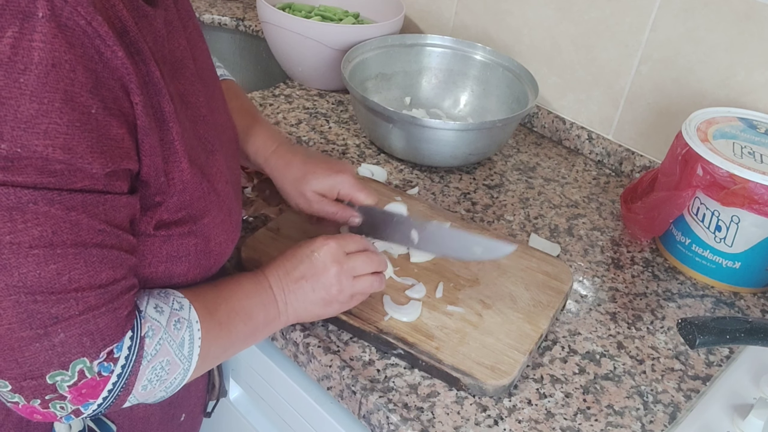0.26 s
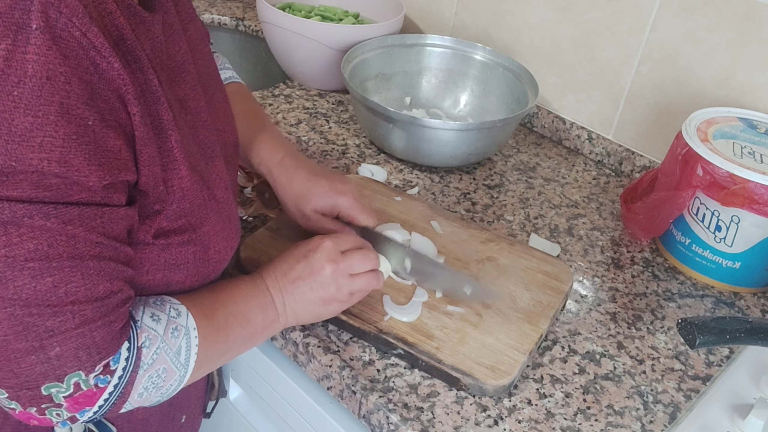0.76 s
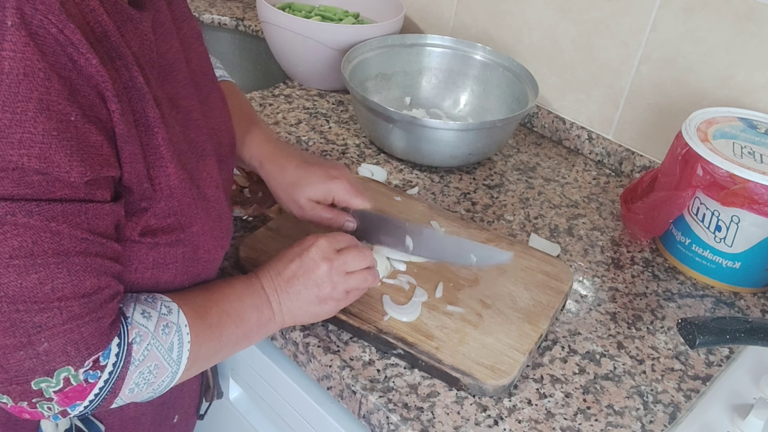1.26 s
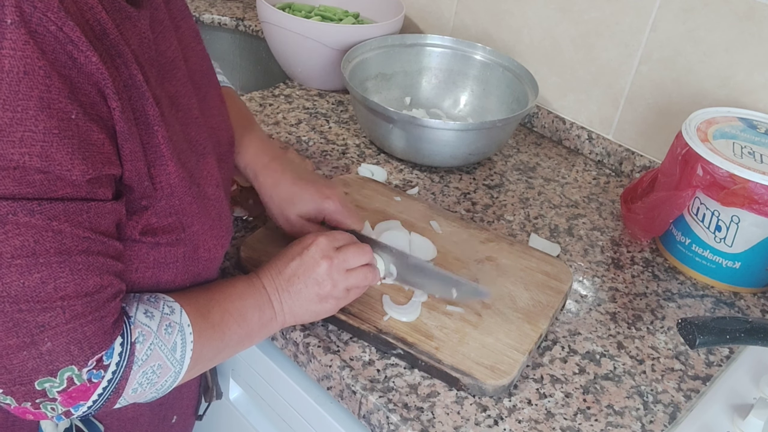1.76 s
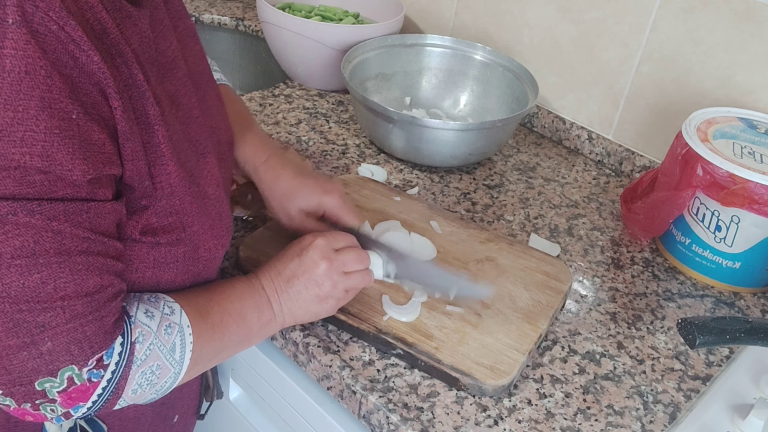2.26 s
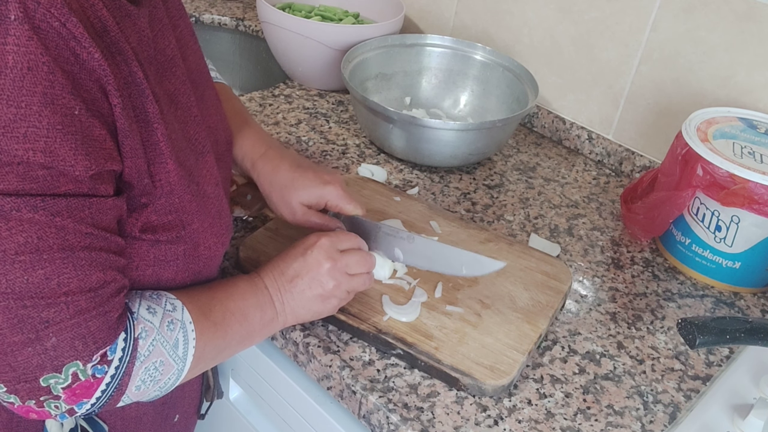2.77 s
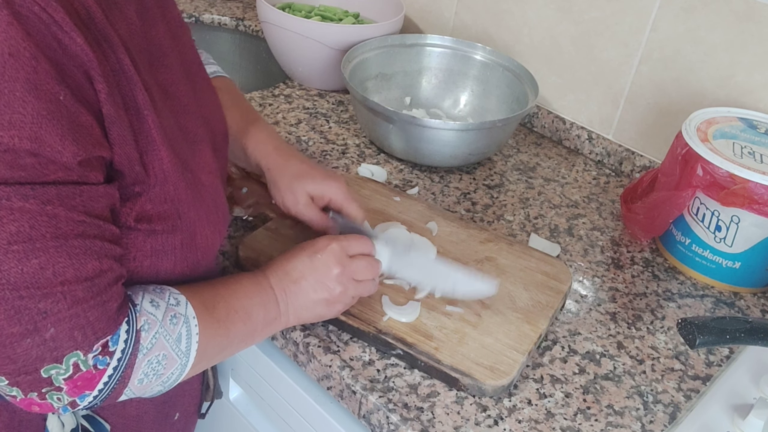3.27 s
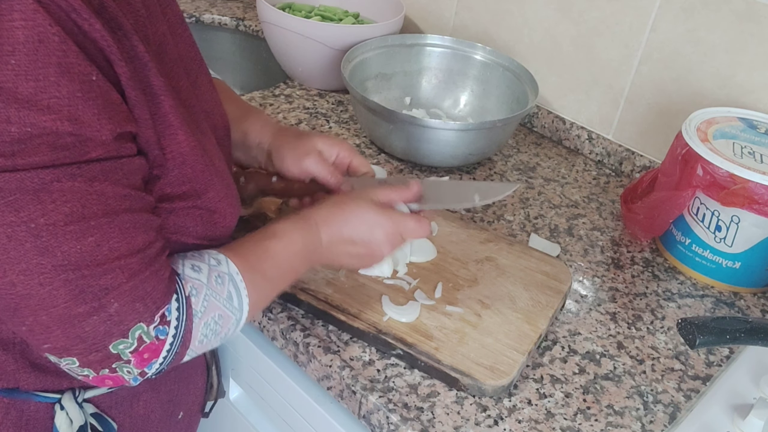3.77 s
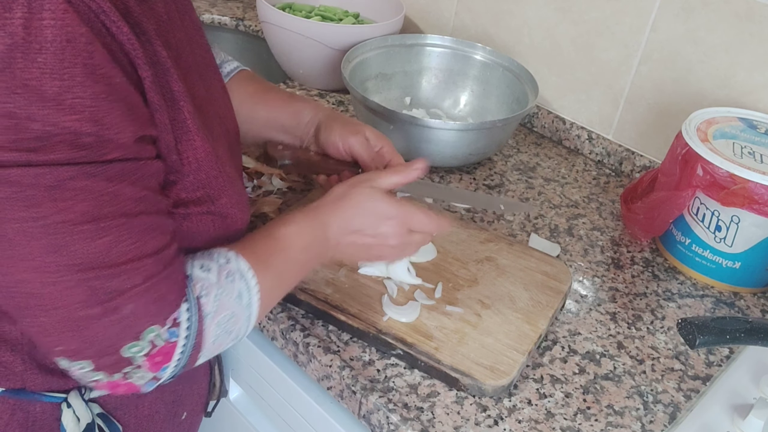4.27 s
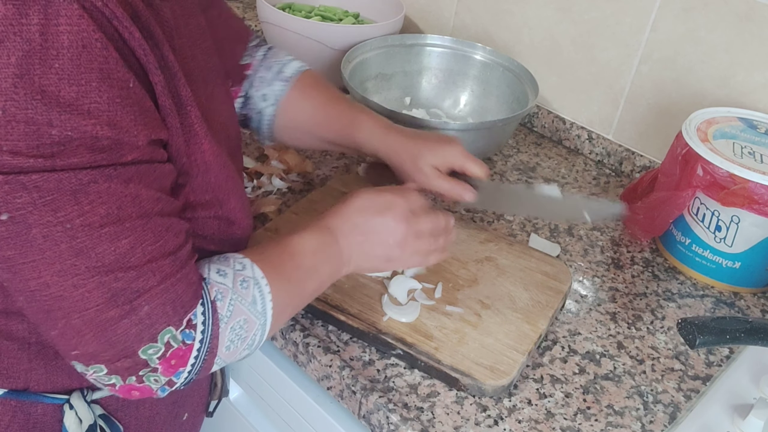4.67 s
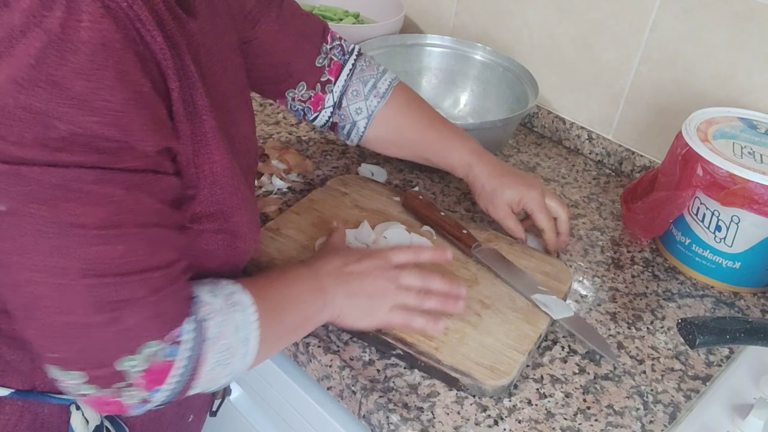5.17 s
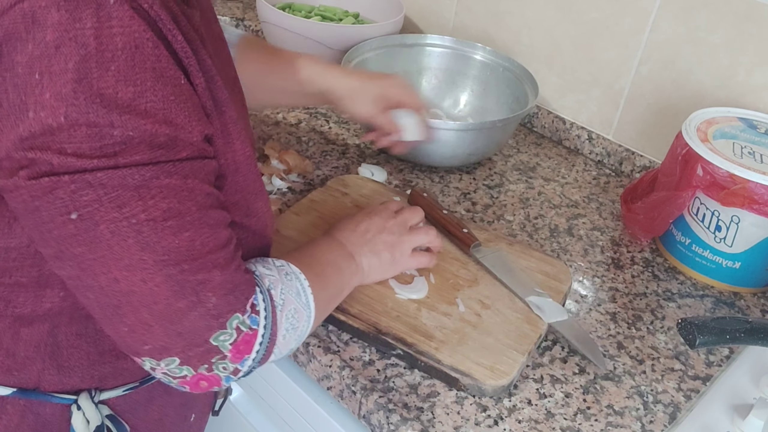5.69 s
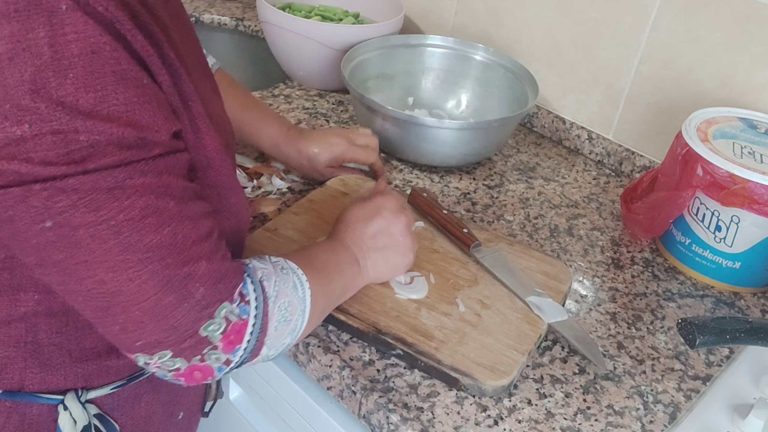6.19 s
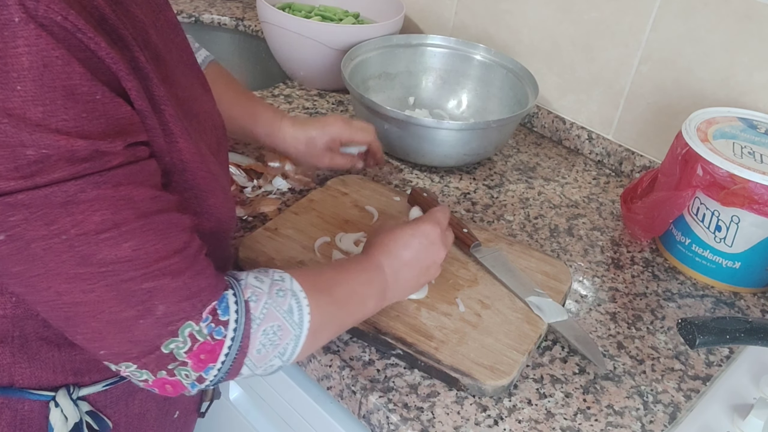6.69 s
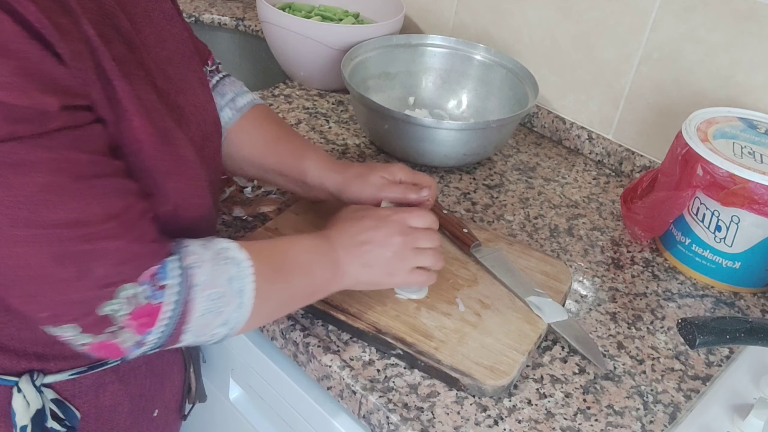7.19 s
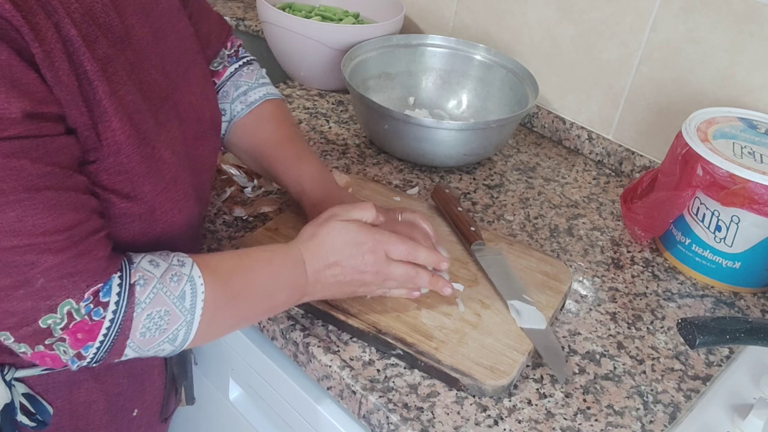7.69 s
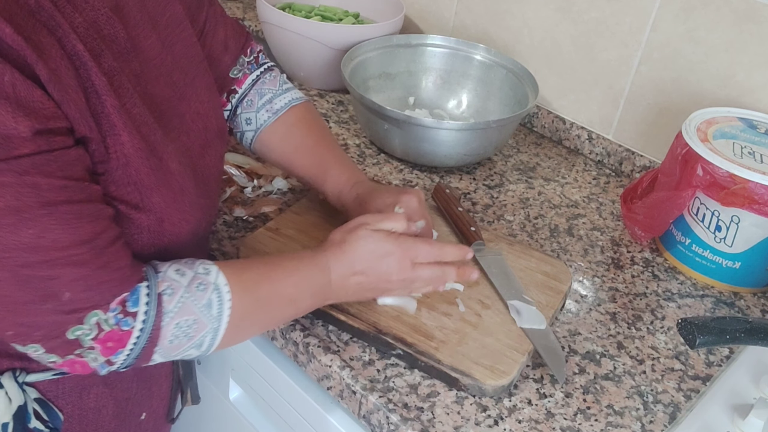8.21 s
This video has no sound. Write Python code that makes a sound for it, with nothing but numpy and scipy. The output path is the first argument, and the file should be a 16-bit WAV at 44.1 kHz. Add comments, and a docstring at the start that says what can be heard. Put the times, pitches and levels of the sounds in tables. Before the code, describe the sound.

A knife chops onion in quick strokes on a wooden board and clatters down, then hands softly gather the wet slices in a small kitchen.

```python
"""A kitchen knife slices an onion on a wooden board, on a stone counter in a small tiled kitchen.
Each stroke crunches through the layers and knocks on the board; the wall echoes it, the room booms
and the cupboard below shudders. The knife is laid down with a clatter, then wet hands gather the
slices and peel them apart, and one ring cracks. An appliance hums; a bird chirps outside."""
import sys
import numpy as np
from scipy import signal
from scipy.fft import rfft, irfft, next_fast_len
from scipy.io import wavfile

SR = 44100
rng = np.random.default_rng(int(sys.argv[2]) if len(sys.argv) > 2 else 0)


def log_audio(samples):
    """Write samples as a 16-bit WAV file to the path given in sys.argv[1]."""
    # one column per channel
    frames = np.atleast_2d(samples).T
    # limit to full scale, then quantise
    limited = np.clip(frames, -1, 1)
    pcm = np.round(limited * 32767).astype(np.int16)
    wavfile.write(sys.argv[1], SR, pcm)


N = 372629
TIME = np.arange(N) / SR

# The blade hits the board. Each row: start in seconds, then in relative dB the level, low thud,
# middle clack, bright edge, steel tick and the crunch that leads up to the hit.
CHOPS = [(0.4977, -4.5, -2, -5, 0, -6, -40), (0.7482, 5.5, -8, -4, -0.5, -3.5, -38),
         (0.9638, 4, -2, 0.5, 4.5, 5, -41), (1.1851, 3.5, -2, -1.5, 3.5, 0.5, -38),
         (1.391, 3.5, 2.5, 2.5, 7.5, 7.5, -48), (1.6028, -4, 8.5, 3, -5, 5, -39),
         (1.814, -4, 9, 2.5, 0.7, 2, -39), (2.025, 3.5, -3, -0.5, -0.5, -5, -38),
         (2.2331, 3.5, -2.5, 0.5, 2.5, -2.5, -40.5), (2.4578, -3.5, 6, 3.5, 6, 7, -68),
         (3.1005, 4.5, -13, 11.5, 0, 4, -40)]
# The knife is laid down, then hands bump the board. Each row: as above, without the crunch.
KNOCKS = [(4.9484, -15, 7.5, 10.5, -3, 14.5), (4.9824, -15, 11, 21.5, 9, 16.5),
          (4.9958, -16.5, 0, 7, 20.5, 26.5), (5.0018, -25, 9, 11, 13, 32), (5.0435, -14, 6, 10.5, 1, -3),
          (5.1599, -25.5, 11.5, 12, 4, 16), (5.392, -40.5, 13, 14, 7, 3), (5.627, -25, 10, 14, 13.5, 17),
          (5.96, -41.5, 2.5, 8, 12, 4), (7.509, -27.5, 14.5, 15.5, 13, 19), (7.845, -30.5, 2.5, 2, 2, 11)]


def from_db(db):
    """Turn decibels (dB) into a factor to multiply a sound by."""
    return np.exp(np.asarray(db) * (np.log(10) / 20))


def rms_one(x):
    """Scale a signal so that its average strength (rms) is 1."""
    return x / np.sqrt(np.mean(x ** 2) + 1e-20)


def at_hz(points, hz):
    """Read between the rows of a (Hz, value) table, with octaves evenly spaced."""
    row_hz, values = np.array(points).T
    return np.interp(np.log(hz + 1e-9), np.log(row_hz), values)


def add(track, s, sound):
    """Mix a sound into a track, starting at s seconds."""
    start = max(round(s * SR), 0)
    track[..., start:start + sound.shape[-1]] += sound[..., :N - start]


def drift(per_s):
    """A curve that wanders to a new random value per_s times a second."""
    values = rng.standard_normal(int(N / SR * per_s) + 2)
    return rms_one(np.interp(TIME * per_s, np.arange(len(values)), values))


def ring(t, hz, t60):
    """A struck tone, silent before t = 0. Its ring time, t60, is how long it takes to fade 60 dB."""
    t = np.maximum(t, 0)
    return np.sin(2 * np.pi * hz * t) * from_db(-60 * t / t60)


def struck(tones, t):
    """One blow rings all the tones of an object; neighbours swing opposite ways."""
    return sum((-1) ** k * from_db(db) * ring(t, hz, t60) for k, (hz, db, t60) in enumerate(tones))


def filtered(x, order, hz, kind="low"):
    """Keep what lies below hz, or between two frequencies for a "band"."""
    return signal.sosfilt(signal.butter(order, hz, kind, fs=SR, output="sos"), x)


def coloured(x, spectrum):
    """Shape the lows and highs of a signal by a (Hz, dB) table; the result has strength 1."""
    size = next_fast_len(N)
    hz = np.arange(size // 2 + 1) * SR / size
    return rms_one(irfft(rfft(x, size) * from_db(at_hz(spectrum, hz)), size)[:N])


def grains(per_s, spread_db, spectrum):
    """Tiny bursts of random size, such as cells breaking or wet skins parting."""
    sizes = from_db(spread_db * np.minimum(rng.exponential(1, N), 4)) * rng.choice([-1, 1], N)
    return coloured(sizes * (rng.random(N) < per_s / SR), spectrum)


def stereo(a, b, hz):
    """Two unrelated signals become left and right, as alike and as loud as the microphones hear them."""
    # Sound from all around. Each row: frequency in Hz, how alike the sides are from -1 to 1.
    likeness = [(20, 0.3), (150, 0.5), (400, 0.6), (700, 0.09), (1300, -0.29), (3000, 0), (15000, 0)]
    # The louder side. Each row: frequency in Hz, left minus right in dB.
    balance = [(20, 2), (1000, -0.5), (2400, -1), (4400, -2.5), (8000, -2), (15000, -3.5)]
    alike = np.clip(at_hz(likeness, hz), -1, 1)
    sides = np.array([[1], [-1]])
    both = np.sqrt((1 + alike) / 2) * a + sides * np.sqrt((1 - alike) / 2) * b
    return both * from_db(sides * at_hz(balance, hz) / 2)


def background(air_db=-50.0, waver_db=1.0):
    """The house rumbles and hisses while an appliance hums."""
    # Rumble and hiss. Each row: frequency in Hz, relative level in dB.
    air_spectrum = [(12, 4.5), (25, -10.5), (50, -14), (120, -22), (300, -26), (600, -28.5), (1200, -33),
                    (3000, -39.5), (7000, -48.5), (15000, -48)]
    # The appliance's tones. Each row: pitch in Hz, average level in dB.
    hum_tones = [(99.5, -74), (199.5, -71.5), (231, -81), (301, -78.5), (344, -76.5), (4813, -88)]
    size = next_fast_len(N)
    a, b = (rfft(coloured(rng.standard_normal(N), air_spectrum), size) for _ in range(2))
    air = irfft(stereo(a, b, np.arange(len(a)) * SR / size), size)[:, :N]
    hum = sum(from_db(db + waver_db * drift(per_s=9.1)) * np.sqrt(2) * np.sin(2 * np.pi * hz * TIME)
              for hz, db in hum_tones)
    return from_db(air_db) * air + hum


def bird():
    """A bird sings short gliding chirps; a fast flutter of pitch makes them raspy."""
    # Each row: start and length in seconds, first and last pitch in Hz, level in dB,
    # flutter as a share of the pitch.
    chirps = [(0.0, 0.062, 3980, 3730, -55.5, 0.073), (0.127, 0.18, 3480, 3320, -69.5, .02),
              (1.54, .08, 2900, 3220, -50, 0.049), (3.79, 0.08, 3206, 3215, -67, .015),
              (3.956, .09, 3300, 3240, -71, 0.019), (4.116, .11, 3240, 3200, -72, 0.016),
              (5.815, 0.2, 3990, 4720, -41.5, 0.074)]
    out, wobble = np.zeros(N), drift(per_s=900)
    for s, length, first_hz, last_hz, db, flutter in chirps:
        count = int(length * SR)
        hz = np.linspace(first_hz, last_hz, count) * (1 + flutter * wobble[:count])
        add(out, s, from_db(db) * np.hanning(count) * np.sin(2 * np.pi * np.cumsum(hz) / SR))
    return out


def onion(gain_db=4.0, first_cut_s=0.019, slowing=0.07, release_s=0.006):
    """Cells burst louder as the blade sinks and stop at the board; snapping layers crunch the same way."""
    # Single layers snap apart. Each row: start and length in seconds, relative level in dB.
    snaps = [(2.824, .018, -47), (3.867, 0.023, -55), (4.516, 0.051, -56), (4.615, 0.025, -59.5),
             (6.919, 0.0049, -46), (6.944, 0.021, -43.5), (7.899, 0.022, -42.5)]
    # Bursting cells. Each row: frequency in Hz, relative level in dB.
    crunch_spectrum = [(200, -9), (800, 2), (2000, -1.5), (4000, -1.5), (6500, 2), (10000, 0.5), (15000, 2)]
    cut_lengths = first_cut_s * (1 + slowing) ** np.arange(len(CHOPS))
    cuts = [(s - length, length, db) for (s, *_, db), length in zip(CHOPS, cut_lengths)]
    effort = np.zeros(N)
    for s, length, db in cuts + snaps:
        end = s + length
        effort += from_db(db) * np.interp(TIME, [s, end, end + release_s], [0.5, 1, 0], left=0)
    return from_db(gain_db) * effort * grains(per_s=7000, spread_db=2.5, spectrum=crunch_spectrum)


def board_blows(rows, thud_hz, bass_db, ring_scale, tick_db, tick_t60, boom_db, boom_t60, boom_lag_s):
    """Blows on the board give two tracks: wood knocking with a tick of steel, and the room booming."""
    # Tones of the board, damped by the counter.
    # Each row: pitch in Hz, relative level in dB, ring time in seconds before ring_scale.
    board_tones = [(264.3, -30.5, 0.01), (427, -8, 0.013), (573.4, -15, 0.075), (802, 2.5, 0.0079),
                   (1160, -4.5, 0.01), (1272, -13.5, 0.021), (1473, -20.5, 0.034), (1790, -13, .012),
                   (2207, -14.5, .011), (2730, -22.5, 0.004), (3450, -31, 0.022)]
    # Tones that build up between the walls. Each row: pitch in Hz, relative level in dB.
    room_tones = [(94, -9), (170, 0), (183, 1.75), (229, 2.5), (339, -5), (374, -4.5), (428, -7.5),
                  (471, -6.5), (552, -2), (643, -4), (681, -7), (708, -9), (754, -18), (773, -21.5),
                  (851, -10), (894, -11), (942, -16.5), (996, -9.5), (1155, -15), (1219, -15),
                  (1370, -20.5), (1696, -18.5), (1790, -31.5), (2078, -24), (2137, -22), (2307, -25.5)]
    # The tick of steel. Each row: frequency in Hz, relative level in dB.
    tick_spectrum = [(1000, -9.5), (2800, 2), (4500, -10.5), (7000, -13), (15000, -23.5)]
    knock, boom = np.zeros(N), np.zeros(N)
    t = np.arange(int(0.42 * SR)) / SR
    tick = coloured(rng.standard_normal(N), tick_spectrum)
    for s, level_db, thud_db, clack_db, edge_db, steel_db, *_ in rows:
        # Where and how hard the blow lands decides which tones stand out.
        colour = [(thud_hz / 2, thud_db / 2 + bass_db), (thud_hz, thud_db), (750, 0), (850, 0),
                  (1250, clack_db), (2000, edge_db)]
        wood = struck([(hz * rng.normal(1, 0.035), db + at_hz(colour, hz), t60 * ring_scale)
                       for hz, db, t60 in board_tones], t)
        # A small board sends out little bass, and its wood gives way, which softens the hit.
        wood = filtered(wood, 2, [243, 2972], "band")
        steel = from_db(tick_db + steel_db - 60 * t / tick_t60) * np.roll(tick, -round(s * SR))[:len(t)]
        room = struck([(hz, db + at_hz(colour, hz) + rng.normal(0, 2), boom_t60)
                       for hz, db in room_tones], t - boom_lag_s)
        add(knock, s, from_db(level_db) * (wood + steel))
        add(boom, s, from_db(level_db + boom_db) * room)
    return np.array([knock, boom])


def cupboard():
    """The cupboard under the counter shudders at each chop."""
    # Each row: pitch in Hz, relative level in dB, ring time in seconds.
    cupboard_tones = [(43.1, -38.5, 0.74), (64, -43.5, .45), (127, -42, .22)]
    out, shudder = np.zeros(N), struck(cupboard_tones, np.arange(SR) / SR)
    for s, db, thud_db, *_ in CHOPS:
        add(out, s, from_db(db + thud_db / 2) * shudder)
    return out


def swipes(gain_db=2.0):
    """Skin or a sleeve brushes the wood in a swell of fine grains."""
    # A sleeve, then hands, sweep the board. Each row: start and length in seconds, relative level in dB.
    sweeps = [(4.76, 0.17, -64), (6.157, 0.097, -48), (6.405, 0.061, -58), (7.76, 0.7, -55.5),
              (8.168, 0.073, -42)]
    # Skin or cloth on wood. Each row: frequency in Hz, relative level in dB.
    skin_spectrum = [(500, -24), (1220, -4.5), (1480, 9.5), (1800, -2), (2400, 1.5), (3800, 0.5),
                     (5500, -9), (10000, -10.5)]
    speed = np.zeros(N)
    for s, length, db in sweeps:
        add(speed, s, from_db(db + gain_db) * np.hanning(int(length * SR)))
    return speed * grains(per_s=4900, spread_db=0.0, spectrum=skin_spectrum)


def loose_knife(gain_db=-6.5, edge_share=0.88):
    """The knife lying on the board rings at every knock, more so when the contact is hard."""
    # Each row: pitch in Hz, relative level in dB, ring time in seconds.
    knife_tones = [(1473, -19, 0.058), (1625, -24, .04), (3940, -29.5, .05), (4670, -29, 0.035),
                   (5150, -32, 0.026)]
    out, ringing = np.zeros(N), struck(knife_tones, TIME[:SR // 4])
    for s, db, _, _, edge_db, _ in KNOCKS:
        add(out, s, from_db(gain_db + db + edge_share * edge_db) * ringing)
    return out


def hand_speed(s, length, rise_s=0.022, settle_s=0.04):
    """A hand gets up to speed, keeps going, then eases to rest."""
    rise = np.clip((TIME - s) / rise_s, 0, 1)
    return rise * np.exp(-np.clip((TIME - s - length) / settle_s, 0, 20))


def hands(rub_db=-3.0, peel_rub_db=-13, wet_db=0.5, lean_db=-6.5, stick_db=1.5, clump_db=4.0):
    """Slices stick and slip over the wood, crackle in clumps between the fingers, and the board rumbles."""
    # A hand pushes slices. Each row: start and length in seconds, then in relative dB
    # the rubbing, the wet crackle and the rumble of the hand's weight.
    slides = [(5.24, 0.36, -69.5, -65, -57), (5.624, 0.046, -47.5, -52.5, -43.5),
              (5.765, .29, -58.5, -48.5, -56.5), (6.057, 0.12, -58.5, -50.5, -55),
              (6.185, .1, -52.5, -50, -55), (7.403, 0.2, -64.5, -65, -52), (7.501, 0.023, -49, -76, -50),
              (7.672, 0.16, -54, -55.5, -58), (7.819, 0.064, -50.5, -54, -61),
              (7.92, 0.34, -59, -46.5, -66), (8.307, 0.13, -58, -57, -74)]
    # Fingers peel wet rings apart. Each row: start and length in seconds, crackle in relative dB.
    peels = [(6.404, 0.062, -56.5), (6.506, 0.12, -55), (6.692, 0.076, -54.5), (6.773, 0.039, -48.5),
             (6.929, 0.053, -42), (7.052, 0.073, -53), (7.219, .035, -54)]
    # The tone of the rubbing, crackle and rumble. Each row: frequency in Hz, relative level in dB.
    rub_spectrum = [(100, -12), (200, -3), (450, -8), (800, 4), (1230, 1.5), (1480, 7), (1750, 0),
                    (2700, 2.5), (5000, -15), (10000, -20)]
    wet_spectrum = [(1500, -17.5), (4000, -8), (7000, -6), (10000, -8), (15000, -6.5)]
    rumble_spectrum = [(30, -24), (65, -2), (95, 0.5), (130, -20.5), (195, 3.5), (300, -8.5), (500, -8.5),
                       (1500, -45)]
    rubbing, crackle, weight = sum(np.outer(from_db(levels_db), hand_speed(s, length))
                                   for s, length, *levels_db in slides)
    peeling = sum(from_db(db) * hand_speed(s, length) for s, length, db in peels)
    friction = grains(per_s=2200, spread_db=4.0, spectrum=rub_spectrum)
    skins = grains(per_s=1800, spread_db=3.6, spectrum=wet_spectrum)
    rub = from_db(rub_db) * (rubbing + from_db(peel_rub_db) * peeling) * friction
    wet = from_db(wet_db) * (crackle + peeling) * skins
    rumble = from_db(lean_db) * weight * coloured(rng.standard_normal(N), rumble_spectrum)
    sticking = rms_one(from_db(stick_db * drift(per_s=60)))
    clumps = rms_one(from_db(clump_db * drift(per_s=70)))
    return rub * sticking + wet * clumps + rumble


def crack(start_s=6.9872, gain_db=-26.5):
    """A stiff onion ring breaks in two between the fingers with one sharp snap."""
    # Its brittle wall. Each row: pitch in Hz, relative level in dB, ring time in seconds.
    crack_tones = [(3570, -1.5, 0.0035), (5250, 2, 0.0043), (6200, -2, 0.0046), (7300, -6, .003)]
    out = np.zeros(N)
    add(out, start_s, from_db(gain_db) * struck(crack_tones, TIME[:SR // 20]))
    return out


def kitchen(x, wall_lag_s=0.00225, wall_gain=0.21, wall_hz=2500, tail_lag_s=0.0022, build_s=0.0011):
    """The direct sound, an echo off the tiles behind the board, then the room's fading tail."""
    # The tail's strength. Each row: frequency in Hz, level in dB against the direct sound.
    tail_levels = [(60, 2), (130, 7.5), (300, 2.5), (600, 0.5), (1000, -0.5), (2000, 2.5), (4000, -1.5),
                   (14000, -7)]
    # The tail's length. Each row: frequency in Hz, ring time in seconds.
    tail_times = [(100, .45), (260, 0.37), (700, 0.37), (1800, 0.28), (4800, .33), (13000, .28)]
    t = np.arange(SR * 3 // 5) / SR
    noise, tail = rng.standard_normal((2, 2, len(t))), 0
    build_up = np.clip((t - tail_lag_s) / build_s, 0, 1)
    edges_hz = np.geomspace(45, 18000, 21)
    for k, (low, high) in enumerate(zip(edges_hz, edges_hz[1:])):
        hz = np.sqrt(low * high)
        band = filtered(noise[k % 2], 2, [low, high], "band")
        band *= from_db(-60 * t / at_hz(tail_times, hz)) * build_up
        # Give each band energy in step with its width.
        band *= np.sqrt(2 * (high - low) / SR / np.sum(band ** 2, axis=1, keepdims=True))
        tail += from_db(at_hz(tail_levels, hz)) * stereo(*band, hz)
    dull = filtered(x, 1, wall_hz)
    echo = np.array([np.interp(TIME - wall_lag_s + lead_s, TIME, dull) for lead_s in (0.00008, 0)])
    # The left microphone faces away: its direct sound is later and duller.
    left = filtered(np.interp(TIME - 0.00002, TIME, x), 1, hz=5000)
    return np.array([left, x]) + wall_gain * echo + signal.oaconvolve(x[None], tail, axes=1)[:, :N]


def scene():
    """Board, knife, onion, hands and bird sound through the kitchen, over its hum."""
    chops = board_blows(CHOPS, thud_hz=403, bass_db=2.0, ring_scale=0.89, tick_db=-29.5, tick_t60=0.05,
                        boom_db=-23.5, boom_t60=0.31, boom_lag_s=0.003975)
    # With no weight on it, the board thuds higher.
    knocks = board_blows(KNOCKS, thud_hz=560, bass_db=-4.0, ring_scale=0.81, tick_db=-32.0,
                         tick_t60=0.045, boom_db=-22.5, boom_t60=0.36, boom_lag_s=0.00409)
    board, boom = from_db(-4.5) * chops + from_db(-2.5) * knocks
    direct = board + loose_knife() + onion() + crack() + hands() + swipes() + bird()
    return kitchen(direct) + boom + cupboard() + background()


def record(dry, port_hz=8800, port_q=5.0, port_dip=0.56, ceiling=0.92, cutoff_hz=15900):
    """The microphone openings dent the treble; the tallest peaks are rounded and the top treble is cut."""
    notched = signal.lfilter(*signal.iirnotch(port_hz, port_q, fs=SR), dry)
    dented = dry + port_dip * (notched - dry)
    rounded = dented / (1 + (dented / ceiling) ** 8) ** (1 / 8)
    return signal.sosfilt(signal.ellip(12, 0.2, 70, cutoff_hz, fs=SR, output="sos"), rounded)


dry = scene()
out = record(dry)
log_audio(out)
```